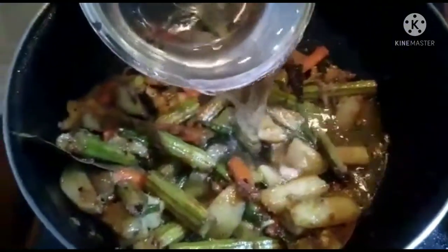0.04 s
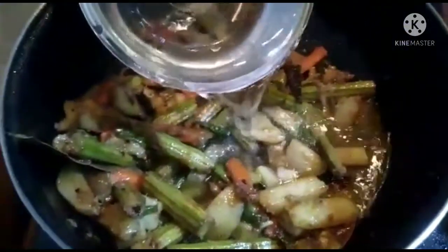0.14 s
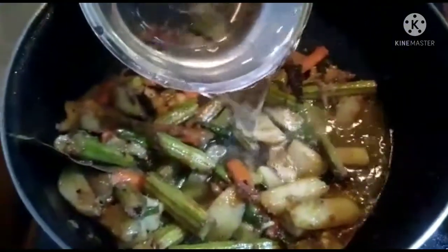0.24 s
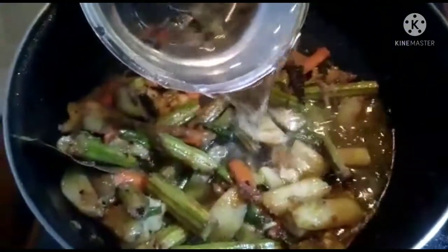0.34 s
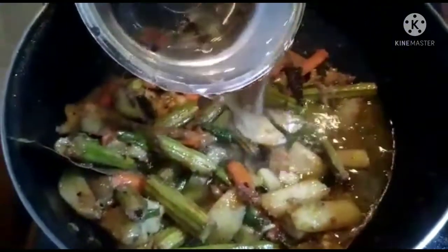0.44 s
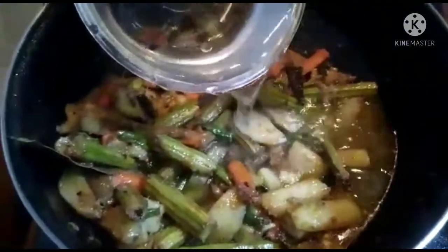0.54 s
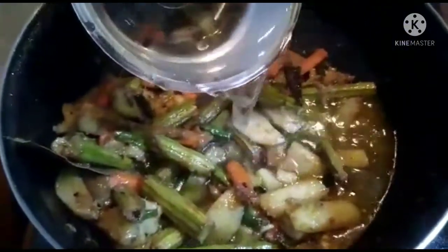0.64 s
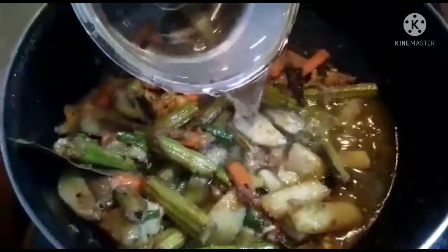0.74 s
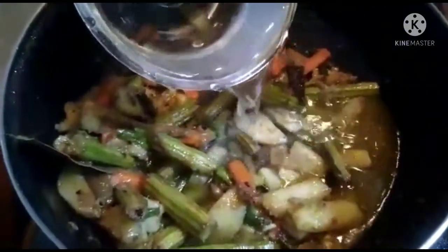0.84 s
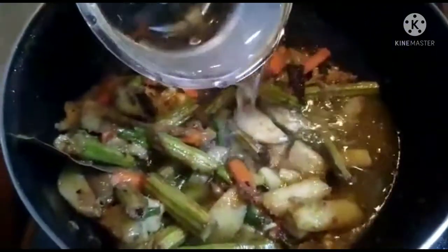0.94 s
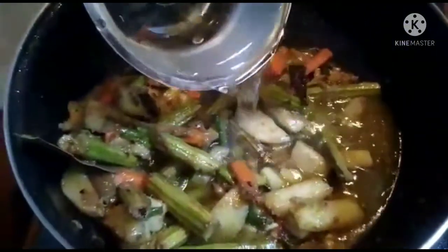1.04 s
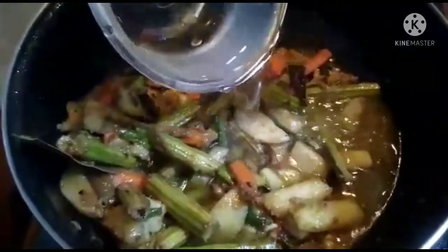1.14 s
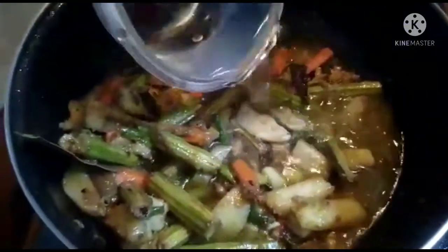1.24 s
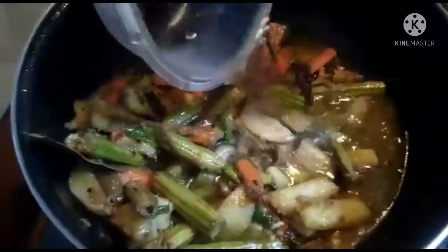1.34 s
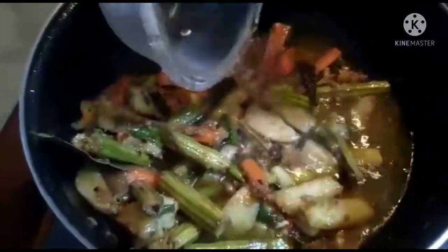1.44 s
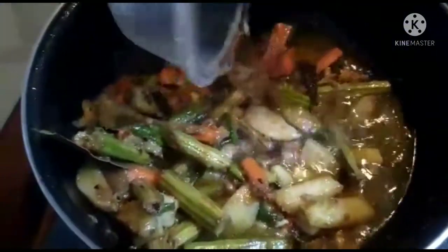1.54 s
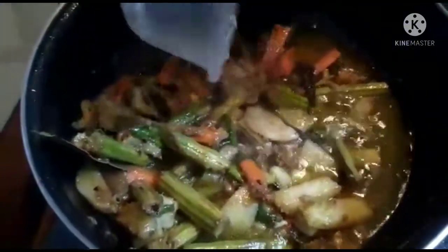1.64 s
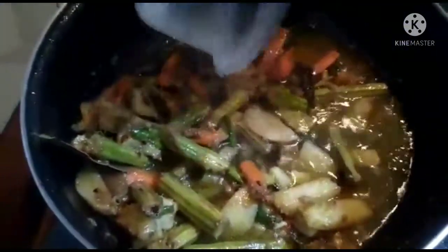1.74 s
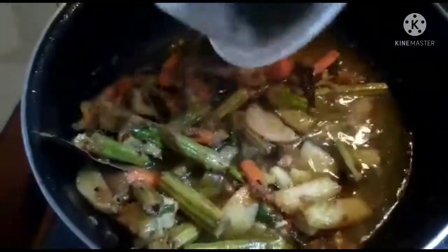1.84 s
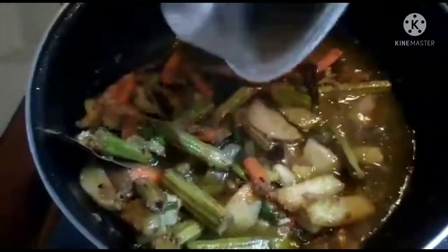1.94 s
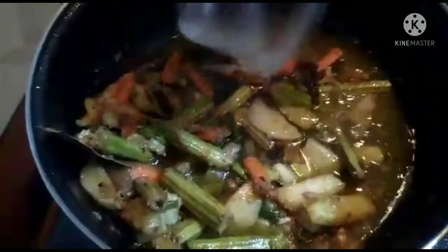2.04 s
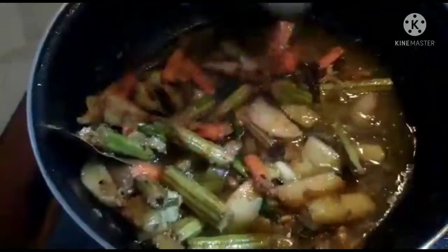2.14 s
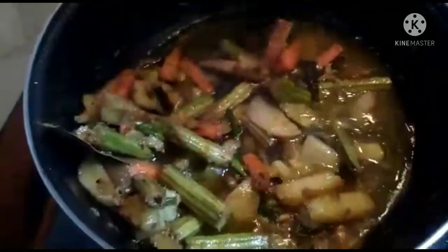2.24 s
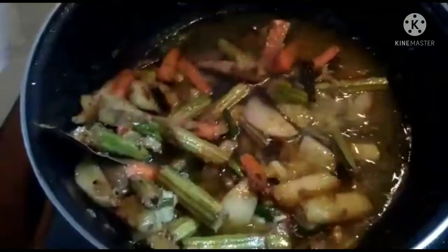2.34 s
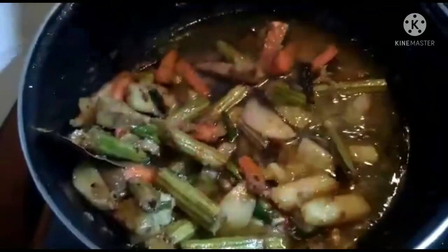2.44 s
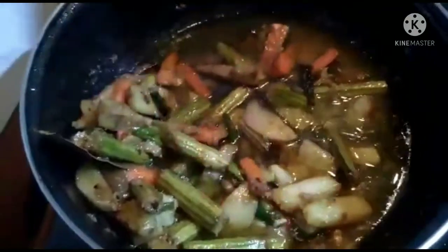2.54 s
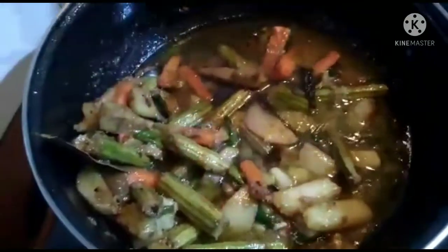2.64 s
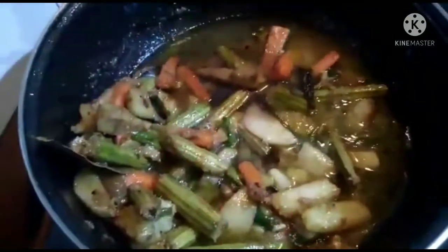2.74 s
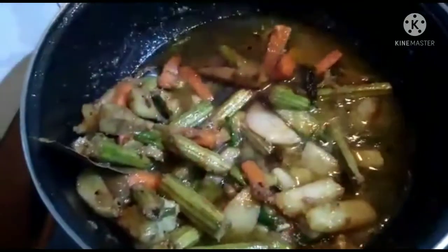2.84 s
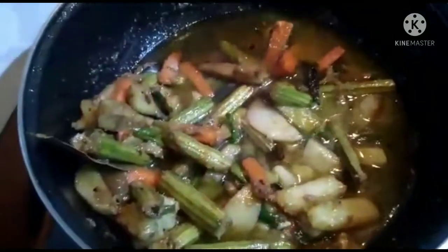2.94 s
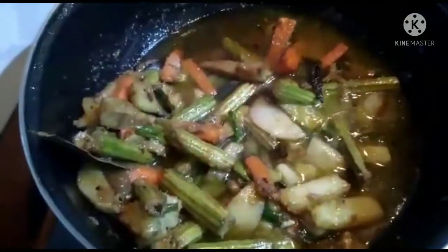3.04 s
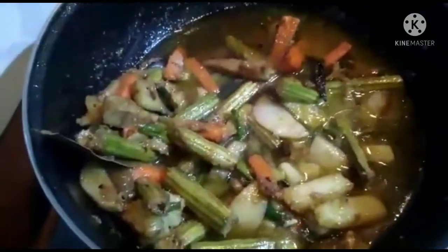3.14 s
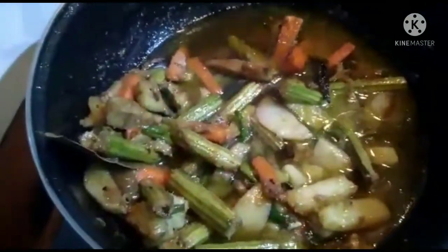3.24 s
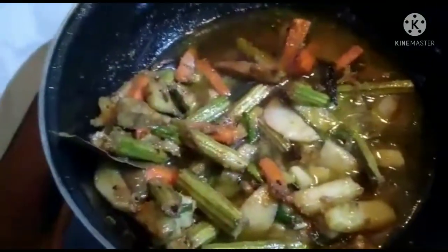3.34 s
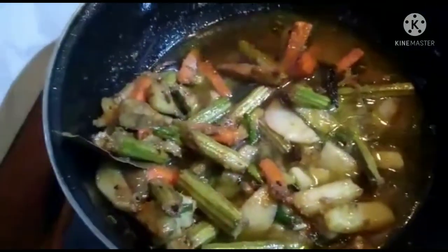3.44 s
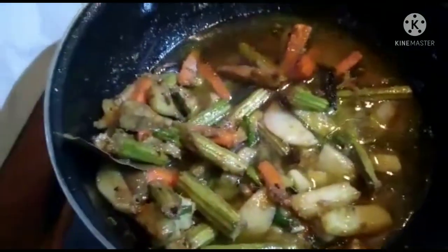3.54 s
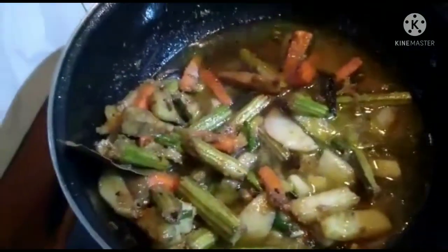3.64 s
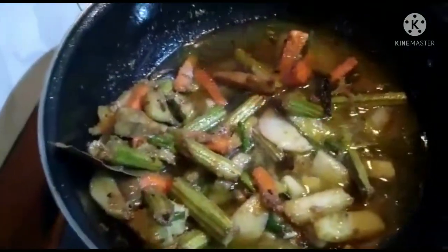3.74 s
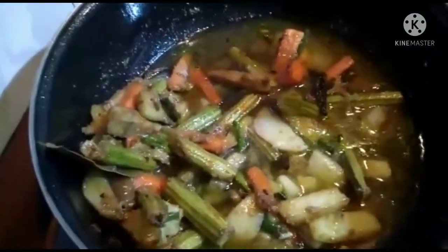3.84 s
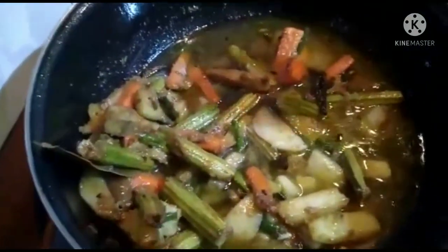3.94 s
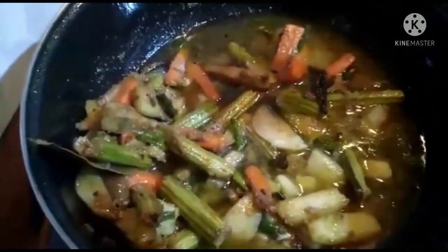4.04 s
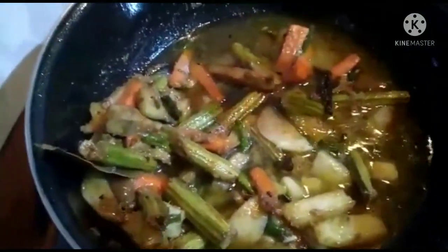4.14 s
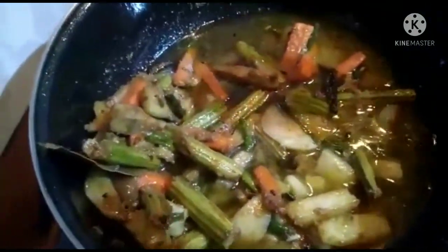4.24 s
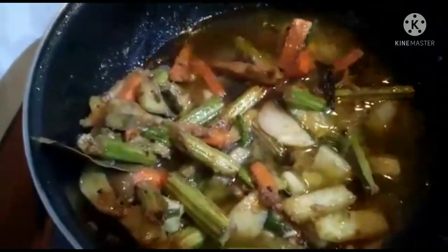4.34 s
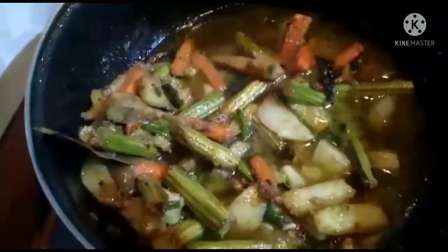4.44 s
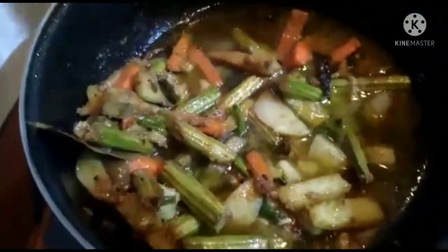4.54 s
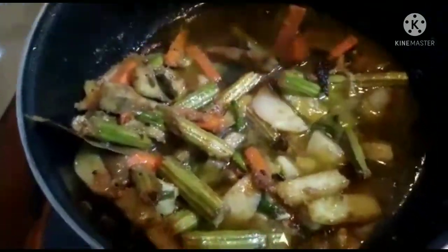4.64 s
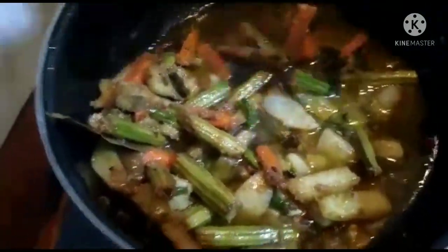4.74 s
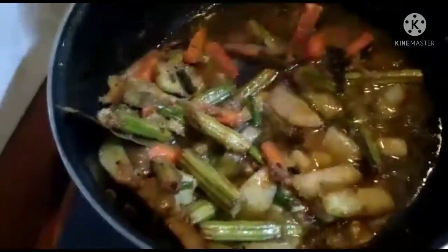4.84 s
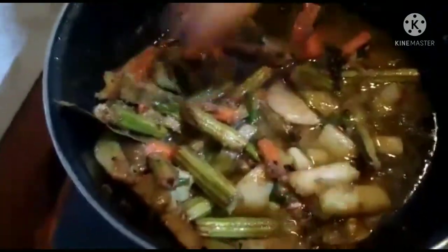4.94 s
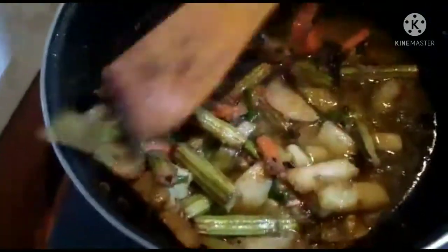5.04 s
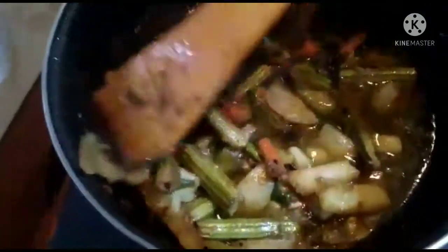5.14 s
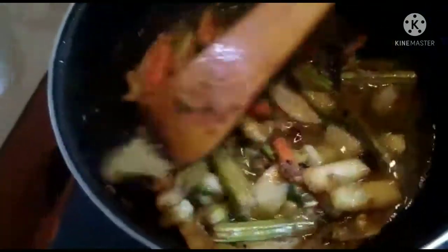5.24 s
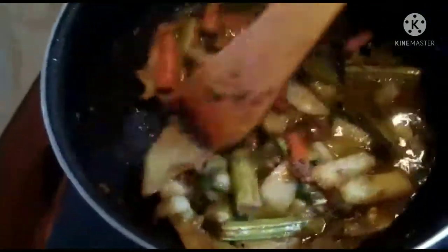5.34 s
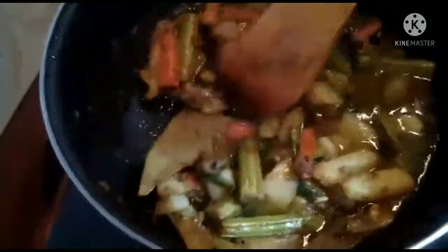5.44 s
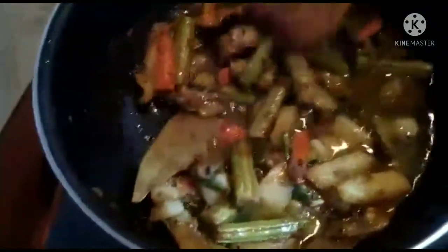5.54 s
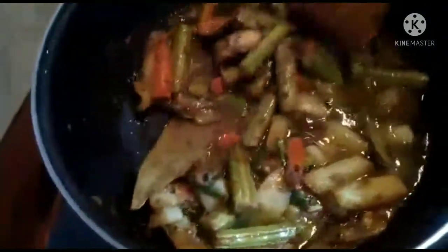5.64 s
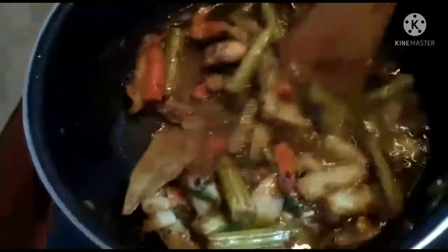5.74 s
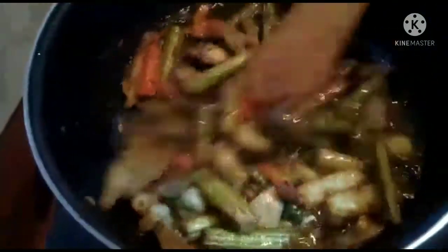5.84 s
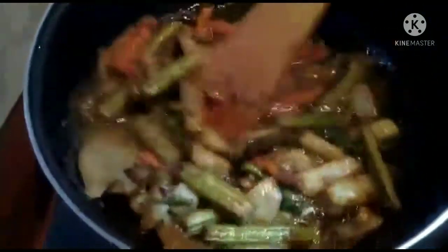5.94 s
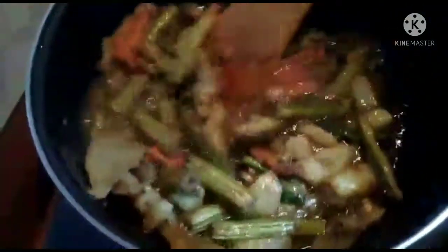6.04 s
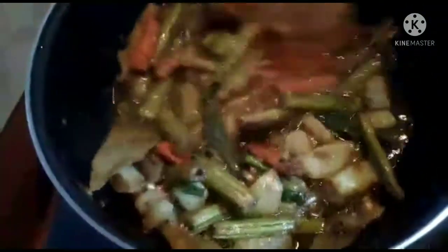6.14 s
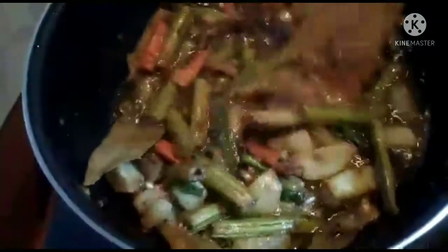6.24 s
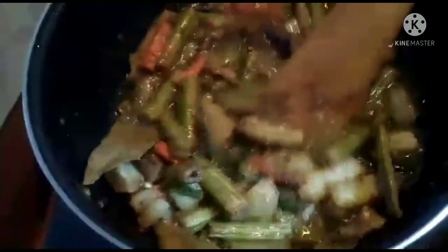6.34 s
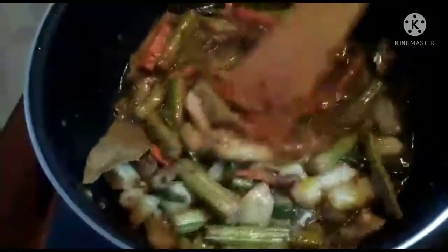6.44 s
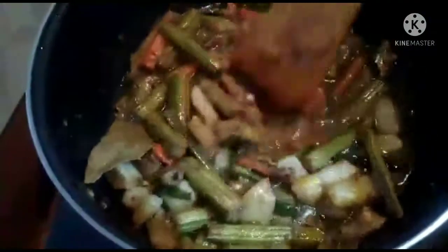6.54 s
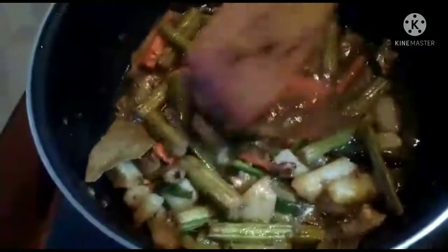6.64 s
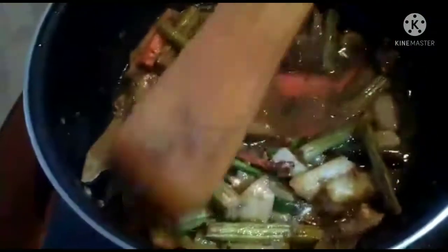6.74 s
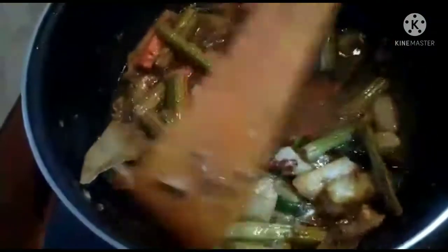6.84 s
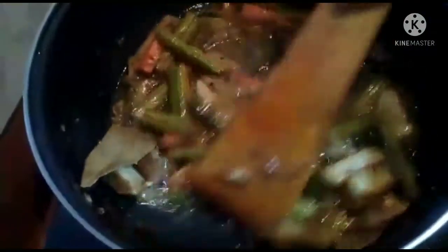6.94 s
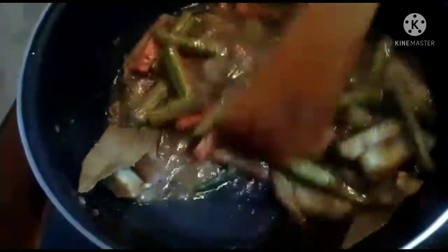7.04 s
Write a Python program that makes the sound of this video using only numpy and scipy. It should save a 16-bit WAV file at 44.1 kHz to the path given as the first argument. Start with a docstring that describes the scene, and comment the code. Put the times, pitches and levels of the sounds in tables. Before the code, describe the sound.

Close to a pan in a small kitchen, poured water sets off a loud, crackling sizzle that peaks early and fades over about three seconds. A faint utensil tick comes next, then the empty jug rattles onto a metal worktop, its hardest blow ringing a steel bowl. A wooden spatula then stirs, with thin hisses, spits and one dry tap. Mains hum and soft burner roar continue throughout.

```python
"""First a loud sizzle: water poured into a hot pan of frying vegetables flashes to steam, then dies down.
The empty jug is set on a metal worktop with a rattle that rings a steel bowl; a wooden spatula then stirs
the pan back to a sizzle. Mains hum and a gas burner's roar fill a small kitchen, the pan to the left.
Steam and flame are shaped noise, bubbles gliding sines, spits short noise puffs; contacts are
noise forces driving resonances, and the worktop, bowl and utensil ring as sums of decaying modes."""
import sys
import numpy as np
from scipy import signal
from scipy.fft import rfft, irfft, next_fast_len
from scipy.io import wavfile
from scipy.ndimage import uniform_filter1d, map_coordinates

SR = 44100
rng = np.random.default_rng(int(sys.argv[2]) if len(sys.argv) > 2 else 0)


def dump_mix(stems):
    """Bounce the given channels to the path in sys.argv[1] as a 16-bit WAV at rate SR."""
    frames = np.atleast_2d(stems).T  # one column per channel
    limited = np.clip(frames, -1, 1)  # hard clip at full scale
    pcm = np.round(limited * 32767).astype(np.int16)
    wavfile.write(sys.argv[1], SR, pcm)


N = 312669

# Mains hum, and the upper band limit of the phone
HUM_HZ, TOP_HZ = 99.7, 15300
# Spectrum of burner and room air: (frequency [Hz], relative level [dB per Hz])
ROAR_SPECTRUM = [(12, -15), (22, -1), (40, -19), (70, -18.5), (100, -10.5), (140, -26), (250, -23),
                 (500, -24.5), (1000, -34), (2000, -34), (5000, -40), (12000, -44), (15600, -67)]
# Resonances of the burner: (frequency [Hz], width [Hz], gain [dB])
FLAME_RESONANCES = [(50, 6, 2), (176.4, 24, 6.5), (192, 20, 10), (630.3, 11.6, 16.5)]
# Likeness of the roar at left and right: (frequency [Hz], correlation [-1 to 1])
ROAR_LIKENESS = [(25, 0.2), (60, 0.99), (300, 0.91), (800, 0.61), (2000, 0.26)]

# Reverberation of the kitchen: (frequency [Hz], t60 [s])
ROOM_DECAY = [(150, 0.39), (1000, 0.45), (4000, 0.37), (10000, 0.21)]
# Likeness of the reverberation at left and right: (frequency [Hz], correlation [-1 to 1])
ROOM_LIKENESS = [(150, .98), (400, 0.84), (700, 0.63), (1200, 0.076), (4000, 0.09)]

# Modes of a steel bowl jolted by one of the hard blows: (frequency [Hz], level [dB], t60 [s])
BOWL_MODES = [ (296.2, -16, 0.5), (875, -28.5, 0.51), (1793.2, -8, .4), (1796.9, -18, .75),
              (1803.8, -18.5, .57), (4028, -27, .36), (4043, -25, .2), (6680, -28, 0.12),
              (10400, -37, 0.13)]
JOLT_S = 4.564
# A small utensil, modes of its bowl then of its stem: (frequency [Hz], level [dB], t60 [s])
UTENSIL_MODES = [
    [(630, -41, 0.13), (704, -47, .1), (825, -43, .15)],
    [(2040, -37, .1), (2120, -38, .1), (2390, -39, 0.18), (2800, -34, 0.068)],
]
# Touches as the utensil settles: (time [s], bowl level [dB], stem level [dB])
UTENSIL_TAPS = [(3.906, -5, 0), (3.919, -2, -2.5), (3.941, -1, -16), (3.97, -14, -13)]

# Contacts of jug, spoon and spatula: (time [s], thud level [dB], clack level [dB], edge level [dB])
CONTACTS = [(3.906, -47, -42, -44), (4.2234, -22, -18, -55), (4.237, -35, -35, -58),
            (4.2571, -26, -24, -56), (4.2764, -30, -26, -58), (4.308, -30.5, -32, -56),
            (4.322, -38, -33, -60), (4.34, -23, -25, -50), (4.3536, -26, -23.5, -52),
            (4.5514, -15, -9, -26.5), (4.557, -25, -18, -30), (4.5644, -18, -10, -22),
            (4.5773, -25, -9, -28), (4.592, -25, -24, -36), (4.608, -29.5, -14.5, -35),
            (5.509, -48, -54, -53), (5.518, -41, -52, -55), (5.529, -48, -58, -54), (5.564, -42, -60, -58),
            (5.577, -49, -60, -58), (5.596, -49, -58, -58), (6.09, -46, -41, -45)]
# Resonances of the worktop: (frequency [Hz], width [Hz], gain [dB])
WORKTOP_RESONANCES = [(311, 50, 14.5), (433, 57, 9), (610, 28, 4.5), (880, 28, 2), (1313, 73, 7),
                      (1815, 94, 11), (2430, 200, 2)]
# Low, middle and high parts of a contact: (frequency [Hz], relative level [dB per Hz])
THUD_SPECTRUM = [(70, -58), (150, -8), (230, -37), (290, -10.5), (450, -12), (700, -11), (1100, -15.5),
                 (1500, -46), (3000, -100)]
CLACK_SPECTRUM = [(500, -53), (900, -9), (1200, -1.5), (1700, -2), (2600, -6), (3300, -34), (4300, -35),
                  (7000, -43), (9000, -80)]
EDGE_SPECTRUM = [(1800, -57), (2800, -1), (3500, -14), (4500, -20.5), (6000, -30), (10500, -27),
                 (12000, -86)]
# Low modes of the worktop: (frequency [Hz], level over the thud [dB], t60 [s])
LOW_MODES = [(139.6, -19.5, 0.15), (173, -17, 0.22), (302.5, 1.5, .11), (422.6, -5.5, 0.18),
             (445.5, -4, 0.14), (600, -13, 0.18), (814, -14, 0.25)]
# Upper modes of the worktop: (frequency [Hz], level over the clack [dB], t60 [s])
UPPER_MODES = [(1046, -16.5, .2), (1266, -17, .25), (1340, -19, 0.2), (1420, -14, 0.24), (1550, -20, .28),
               (1730, -13, 0.28), (1860, -21, .15), (2010, -16, .28), (2090, -14, 0.24), (2400, -26, .2),
               (2490, -20, .2), (2600, -18, .2), (3064, -34, 0.32)]
# Decay of the contact force; room over direct sound; scatter of a mode's level from blow to blow
KNOCK_T60_S, KNOCK_ROOM_DB, UNEVEN_DB = 0.021, 1, 2.5

# Resonances of the pan: (frequency [Hz], width [Hz], gain [dB])
PAN_RESONANCES = [(474, 11, 10.5), (642, 27, 11.5), (867, 5.5, 13.5), (1152, 7.9, 9.5), (1682, 42, 9),
                  (2125, 48, 4.5), (2456, 37, 3), (3750, 52, 4.5), (4115, 38, 5), (4490, 190, 5),
                  (4790, 94, 5.5), (5140, 134, 6.5)]
# Extra resonances while the jug hangs over the pan: (frequency [Hz], width [Hz], gain [dB])
UNDER_JUG_RESONANCES = [(2715, 160, 7.5), (3300, 150, 4.5), (3500, 30, 2), (4300, 40, 6), (5970, 150, 10)]
# Extra resonances once the jug has gone: (frequency [Hz], width [Hz], gain [dB])
OPEN_PAN_RESONANCES = [(2680, 400, 6.5), (3080, 82, 5.5), (3300, 80, 0.5), (3650, 28, 5), (6100, 210, 3)]
# Departure of the jug: (start [s], end [s])
JUG_LEAVES = (1.15, 1.35)
# Spits of the pan, and the thin hiss of the spatula's rub near 5.5 s:
# (time [s], peak level [dB], centre [Hz], half-width [octaves], t60 [s])
NOISE_PUFFS = [(0.4089, -11, 2760, 0.9, 0.038), (0.619, -11, 2820, 0.46, 0.027),
               (0.916, -12, 6060, 0.91, .03), (1.117, -11, 4820, 0.83, .02), (1.156, -9.5, 3000, 0.7, .04),
               (1.427, -15, 3000, 0.72, 0.022), (1.628, -28, 2640, .8, .02),
               (1.528, -14.5, 7400, 0.5, .018), (2.032, -21, 6000, .4, .015),
               (2.076, -21.5, 3060, 0.45, 0.11), (2.084, -25, 3280, 0.91, 0.03),
               (2.195, -23, 3000, 0.72, .015), (2.277, -24, 3100, 0.3, 0.089),
               (2.413, -25, 2540, 0.64, 0.021), (3.6036, -33, 6000, 0.99, 0.025),
               (4.039, -34, 2730, 1.2, .018), (5.463, -33, 2710, 0.59, .03), (5.478, -37, 2750, 0.33, .03),
               (5.4838, -29, 2950, 0.44, 0.024), (5.527, -34.5, 2650, .15, .1),
               (5.553, -38, 2550, .15, .05), (5.803, -37.5, 3850, 0.11, 0.15),
               (5.839, -29.5, 4520, 1.3, .018), (5.9039, -30.5, 5760, .5, 0.02),
               (5.9336, -39, 2780, 0.28, .03), (5.954, -40, 4500, .6, .015),
               (6.0314, -31, 7500, 0.66, 0.019), (6.065, -33, 4500, .9, .018),
               (6.087, -25.5, 3500, 2.8, 0.041), (6.1, -30, 4500, 0.56, .03),
               (6.2223, -27, 8400, 0.21, 0.037), (6.263, -30, 7500, .6, .015),
               (6.428, -30, 1360, .25, .012), (6.427, -35, 2850, 0.25, 0.02),
               (6.431, -27, 2450, 0.18, .022), (6.444, -29, 2520, .2, .02),
               (6.449, -9.5, 5400, 0.96, 0.0048), (6.4523, -26, 3800, 0.67, .03),
               (6.467, -33, 3700, .4, .02), (6.504, -30, 5200, 0.55, .012), (6.8682, -29, 2700, 0.89, 0.02),
               (6.889, -27, 3450, 0.9, .025)]
PUFF_RISE_S, PUFF_TOP_HZ = 0.00034, 11000  # attack and upper edge of every puff

# Cooling after the pour, then flaring as the spatula bares hot metal:
# (time [s], hiss level [dB], simmer level [dB])
SIZZLE_COURSE = [(0, -27.5, -40), (.04, -27.5, -38.5), (.12, -25, -38.5), (.33, -24, -37.5),
                 (.5, -28.5, -40.5), (1.17, -29.5, -38.5), (1.5, -29.5, -39.5), (2, -36, -43),
                 (2.7, -44, -46.5), (3.4, -48, -52.5), (4.2, -52, -56), (5, -55, -60), (5.455, -55, -60),
                 (5.48, -45.5, -60), (5.53, -49.5, -54), (5.62, -51.5, -65), (5.7, -47, -60),
                 (5.77, -51, -64.5), (6.1, -48, -57), (6.27, -47.5, -60.5), (6.47, -41, -52.5),
                 (6.6, -46.5, -54), (6.75, -44.5, -56.5), (6.82, -47, -59), (6.91, -44.5, -52.5),
                 (7.09, -48, -57)]
# Spectra of steam, oil and sauce: (frequency [Hz], relative level [dB per Hz])
HISS_SPECTRUM = [(900, -54), (1500, -15), (2100, -11.5), (2600, -7), (3600, -9), (4800, -7), (6000, -14.5),
                 (7000, -27), (9000, -32), (15000, -100)]
FIZZ_SPECTRUM = [(3240, -36), (5500, -3.5), (6920, -0.5), (9290, -0.5), (11000, -7.5), (12300, -19.5),
                 (14400, -19.5), (15500, -34)]
SIMMER_SPECTRUM = [(150, -13.5), (250, -16), (400, -10), (600, -9), (900, -6), (1300, -1), (1700, -10.5),
                   (2400, -3.5), (4800, -100)]
# Large steam bubbles, and a dry tap of the spatula (6.449 s):
# (time [s], level [dB], pitch [Hz], life [cycles], phase gained per life [share])
BUBBLES_AND_TAP = [(.298, -25.5, 2030, 16, 0.024), (.468, -21, 3260, 19, 0.05),
                   (1.25, -19, 2980, 40, 0.015), (5.485, -43, 3040, 17, 0.025), (5.68, -40, 2700, 21, .037),
                   (6.125, -40, 4000, 34, 0.002), (6.425, -31.5, 2880, 47, -0.12),
                   (6.449, -28, 1240, 4.9, 0.03), (6.963, -37, 1400, 12, 0.045)]
# Fizz over hiss when the hiss stands at HOT_DB; dB of fizz per dB of hiss; the reference hiss
FIZZ_DB, FIZZ_GROWS, HOT_DB = -3, 1.076, -30
# Likeness of the sizzle at left and right: (frequency [Hz], correlation [-1 to 1])
SIZZLE_LIKENESS = [(300, 0.81), (700, 0.86), (1500, 0.1), (4000, 0.17), (12000, 0.066)]
# Phase between the sides, which widens the sizzle: (frequency [Hz], phase by which left leads [rad])
LEFT_LEAD = [(0, -2), (950, 1), (1640, 2.5), (2760, -0.14), (3360, -6.5), (5250, -20), (8790, -23.5),
             (15200, -48)]
# Level difference between the sides: (frequency [Hz], left over right [dB])
LEFT_OVER_RIGHT = [(60, 0), (250, 0.5), (550, 0), (1500, 1.5), (2800, 9), (5500, 5), (9500, 4.5),
                   (15000, -0.5)]


def amp(db):
    """Level definition: a gain is ten to the power dB / 20."""
    return 10 ** (np.asarray(db) / 20)


def unit(x):
    """Normalisation by mean power: x at rms 1."""
    return x / np.sqrt(np.mean(x ** 2) + 1e-20)


def along(points, hz):
    """Logarithmic frequency scale: interpolate (frequency, value) points."""
    f, v = np.transpose(points)
    return np.interp(np.log(hz + 1), np.log(f + 1), v)


def bumps(modes, hz):
    """Resonance: each mode adds a bell of gain in dB about its own frequency."""
    return sum(db / (1 + (2 * (hz - c) / w) ** 2) for c, w, db in modes)


def wobble(rate):
    """Slow random modulation: a smooth curve through `rate` random knots a second."""
    knots = rng.standard_normal(int(N * rate / SR) + 4)
    return map_coordinates(knots, [np.arange(N) * rate / SR])


def filtered(x, response):
    """Linear filtering: multiply the spectrum of x by a response of frequency."""
    n = x.shape[-1]
    m = 2 * next_fast_len(n // 2 + SR // 20)
    return irfft(rfft(x, m) * response(np.fft.rfftfreq(m, 1 / SR)), m)[..., :n]


def causal(db):
    """Minimum phase: the response with this gain that starts no earlier than its cause."""
    cepstrum = irfft(np.log(amp(db)))
    half = len(cepstrum) // 2
    cepstrum[1:half] *= 2
    cepstrum[half + 1:] = 0
    return np.exp(rfft(cepstrum))


def spread(pair, gain, alike):
    """Interaural coherence: mix two unrelated signals to a coloured left and right of given likeness."""
    def mid_and_side(hz):
        turn = np.arccos(np.clip(along(alike, hz), -1, 1)) / 2
        return gain(hz) * [np.cos(turn), np.sin(turn)]

    mid, side = filtered(pair, mid_and_side)
    return np.array([mid + side, mid - side])


def rush(spectrum, modes, alike, patchy_db, crackle=0, count=1, spread_db=0):
    """Turbulence as shaped stereo noise with patchy gain and optional tiny pops; its mid has rms 1."""
    z = signal.stft(rng.standard_normal((2, N)), nperseg=256)[2]
    field = uniform_filter1d(rng.standard_normal(z.shape[1:]), size=5, axis=0)
    field = uniform_filter1d(field, size=7, axis=1)
    pair = unit(signal.istft(z * amp(patchy_db * unit(field)), nperseg=256)[1][:, :N])
    when, size, left, right = rng.random((count, 4)).T
    strength = amp(-spread_db * np.log(1 - .99 * size))  # most bubbles are faint, a few are loud
    pops = [np.bincount((when * N).astype(int), strength * (2 * side - 1), N) for side in (left, right)]
    source = pair + crackle * unit(np.array(pops))
    out = spread(source, lambda hz: amp(along(spectrum, hz) + bumps(modes, hz)), alike)
    return out / np.std(out.mean(axis=0))


def ringing(modes, s, rise, lag):
    """Modal superposition: decaying sines, delayed by `lag` at the right; close pairs beat."""
    out = np.zeros((2, N + SR))
    t = np.clip(np.arange(SR) / SR - np.array([[0], [lag]]), 0, None)
    ring = sum(amp(db - 60 * t / t60) * np.sin(2 * np.pi * hz * t) for hz, db, t60 in modes)
    out[:, round(s * SR):][:, :SR] = ring * (1 - np.exp(-t / rise))
    return out[:, :N]


def uneven(modes):
    """Dependence on the striking conditions: each blow scatters the modes' levels and pitches."""
    hz, db, t60 = np.transpose(modes)
    struck_hz = hz * (1 + 0.0044 * rng.standard_normal(len(hz)))
    struck_db = db + UNEVEN_DB * rng.standard_normal(len(hz))
    return np.transpose([struck_hz, struck_db, t60])


def hum():
    """Mains hum: a single tone whose phase and level waver a little."""
    phase = 2 * np.pi * HUM_HZ * np.arange(N) / SR + 0.2 * wobble(16)
    waver_db = 2.1 * wobble(10) + .6 * wobble(4)
    return amp(-42.5 + waver_db) * np.sin(phase)


def burner():
    """Combustion roar: steady broadband noise coloured by the resonances of the burner."""
    return amp(-50.0) * rush(ROAR_SPECTRUM, FLAME_RESONANCES, ROAR_LIKENESS, patchy_db=2.0)


def kitchen(x):
    """Reverberation: convolve with noise decaying at each frequency's own rate, the bass alike at both sides."""
    hz, t, z = signal.stft(rng.standard_normal((2, len(x))), SR, nperseg=256)
    decay = amp(-60 * t / along(ROOM_DECAY, hz)[:, None])
    tail = signal.istft(z * decay, SR, nperseg=256)[1]
    tail = spread(tail / np.linalg.norm(tail[0]), np.ones_like, ROOM_LIKENESS)
    delayed = np.pad(x, (150, 0))[None]  # samples before the room answers
    return signal.fftconvolve(delayed, tail, axes=1)[:, :len(x)]


def bowl():
    """Free vibration: a jolted steel bowl rings in its own modes, whose close pairs beat."""
    return ringing(BOWL_MODES, JOLT_S, rise=.022, lag=.0002)


def spoon():
    """Repeated impact: a light utensil touches down and rocks to rest, its bowl and stem ringing."""
    out = np.zeros((2, N))
    for s, *levels in UTENSIL_TAPS:
        for part, db in zip(UTENSIL_MODES, levels):
            out += amp(db) * ringing(uneven(part), s, rise=0.00058, lag=.00008)
    return out


def knocks():
    """Forced and free vibration: a scatter of force drives the worktop, its modes ring on, the room answers."""
    out, t = np.zeros((2, N + SR)), np.arange(int(.4 * SR)) / SR
    parts = (THUD_SPECTRUM, CLACK_SPECTRUM, EDGE_SPECTRUM)

    def worktop(hz):
        return np.array([causal(bumps(WORKTOP_RESONANCES, hz) + along(part, hz)) for part in parts])

    for s, thud_db, clack_db, edge_db in CONTACTS:
        force = amp(-60 * t / KNOCK_T60_S) * rng.standard_normal((3, len(t)))
        body = filtered(force, worktop)
        body /= np.abs(body).max(axis=1, keepdims=True)
        near = amp([thud_db, clack_db, edge_db]) @ body
        out[:, round(s * SR):][:, :len(t)] += near + amp(KNOCK_ROOM_DB) * kitchen(near)
        out[:, :N] += amp(thud_db) * ringing(LOW_MODES, s, rise=0.0053, lag=0)
        out[:, :N] += amp(clack_db) * ringing(uneven(UPPER_MODES), s, rise=0.0017, lag=0.00023)
    return out[:, :N]


def spits_and_rub():
    """Band-limited transients: each spit or rub is a short puff of noise around its own pitch."""
    out, t = np.zeros((2, N + SR)), np.arange(SR // 10) / SR
    for s, db, centre_hz, octaves, t60 in NOISE_PUFFS:
        def puff_response(hz):
            resonance_db = bumps(PAN_RESONANCES + OPEN_PAN_RESONANCES, hz)
            offset = np.log2((hz + 1) / centre_hz) / octaves
            band_db = -20 * np.log10(1 + offset ** 4)
            edge_db = -20 * np.log10(1 + (hz / PUFF_TOP_HZ) ** 12)
            return causal(resonance_db + band_db + edge_db)

        envelope = amp(-60 * t / t60) * (1 - np.exp(-t / PUFF_RISE_S))
        puff = filtered(envelope * rng.standard_normal((2, len(t))), puff_response)
        out[:, round(s * SR):][:, :len(t)] += amp(db) * puff / np.abs(puff).max()
    return out[:, :N]


def gliding_sines(s, db, hz, cycles, glide=0.04):
    """Damped oscillation: brief sines with soft start and gliding pitch, placed at random across the sides."""
    t = np.arange(SR // 40) / SR
    age = t * (hz / cycles)[:, None]  # in lives
    envelope = np.e * 3 * age * np.exp(-3 * age)
    phase = 2 * np.pi * hz[:, None] * t * (1 + np.reshape(glide, (-1, 1)) * age)
    song = amp(db)[:, None] * envelope * np.sin(phase)
    where = ((s * SR).astype(int)[:, None] + np.arange(len(t))).ravel()
    sides = amp(rng.normal(0, 0.79, (len(s), 2)))
    return np.array([np.bincount(where, (song * side[:, None]).ravel(), N + len(t))[:N] for side in sides.T])


def bubble_swarm():
    """Superposition of many small oscillators: bubbles at random times, louder near pan resonances."""
    when, size, pitch, life = rng.random((1500, 4)).T
    hz = 2200 * 2 ** (1.4 * pitch)
    db = bumps(PAN_RESONANCES + OPEN_PAN_RESONANCES, hz) - 3 * np.log(1 - .98 * size)
    return unit(gliding_sines(when * N / SR, db, hz, 12 + 30 * life))


def steam():
    """Cavity resonance: boiling noise crossfades from the covered to the open pan as the jug leaves."""
    covered, bare = (
        rush(HISS_SPECTRUM, PAN_RESONANCES + extra, SIZZLE_LIKENESS,
             patchy_db=1.7, crackle=0.38, count=8000, spread_db=3.5)
        for extra in (UNDER_JUG_RESONANCES, OPEN_PAN_RESONANCES))
    gone = np.interp(np.arange(N) / SR, JUG_LEAVES, [0, np.pi / 2])  # equal-power angle
    return np.cos(gone) * covered + np.sin(gone) * bare + 0.3 * bubble_swarm()


def sizzle():
    """Boiling noise: steam hisses, oil fizzes, sauce simmers in shared spurts; bubbles sing, a spatula taps."""
    s, *levels = np.transpose(SIZZLE_COURSE)
    hiss_db, simmer_db = (np.interp(np.arange(N) / SR, s, db) for db in levels)
    fizz_db = HOT_DB + FIZZ_DB + FIZZ_GROWS * (hiss_db - HOT_DB)
    spurt_db = 1.86 * wobble(7.99) + 0.27 * wobble(14) + 0.21 * wobble(40)

    hiss = amp(hiss_db + 0.67 * spurt_db) * steam()
    bubbles_and_tap = gliding_sines(*np.transpose(BUBBLES_AND_TAP))
    fizz_db = fizz_db + 0.85 * spurt_db + 0.26 * wobble(8.8) + 0.92 * wobble(25)
    fizz = amp(fizz_db) * rush(FIZZ_SPECTRUM, [], SIZZLE_LIKENESS,
                               patchy_db=1.5, crackle=0.59, count=8000, spread_db=4.0)
    simmer_db = simmer_db + 0.5 * spurt_db + 0.73 * wobble(8.6)
    simmer = amp(simmer_db) * rush(SIMMER_SPECTRUM, PAN_RESONANCES, SIZZLE_LIKENESS, patchy_db=1.5)

    def side_phase(hz):
        return np.exp(1j * along(LEFT_LEAD, hz) * np.array([[.5], [-.5]]))

    return filtered(hiss + bubbles_and_tap + fizz, side_phase) + simmer


def scene():
    """Diffraction: near sources are mostly louder on the left, where the phone shades the right microphone."""
    def shading(hz):
        return amp(along(LEFT_OVER_RIGHT, hz) * np.array([[.5], [-.5]]))

    background = hum() + burner()
    near = bowl() + spoon() + knocks() + spits_and_rub() + sizzle()
    return background + filtered(near, shading)


def record(dry):
    """Band limitation: the phone keeps nothing from its band limit upward."""
    return filtered(dry, lambda hz: hz < TOP_HZ)


dry = scene()
out = record(dry)
dump_mix(out)
```